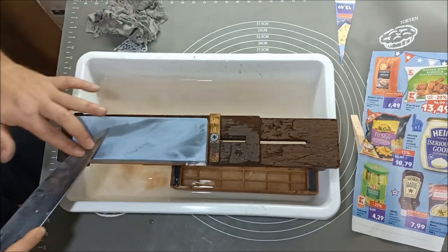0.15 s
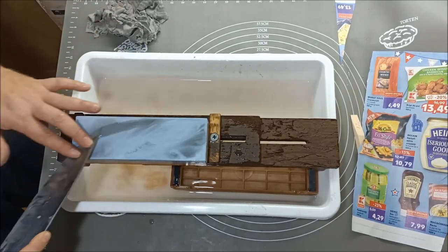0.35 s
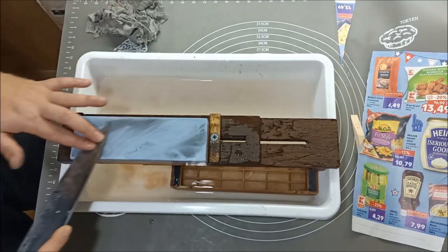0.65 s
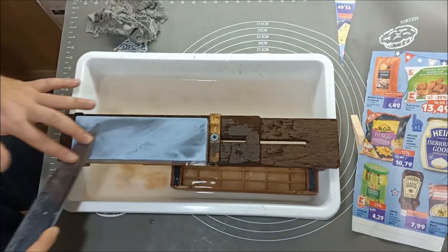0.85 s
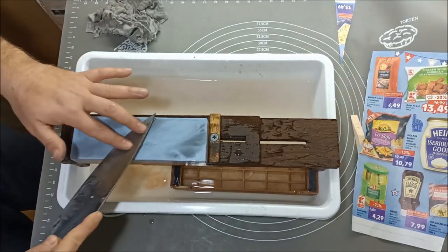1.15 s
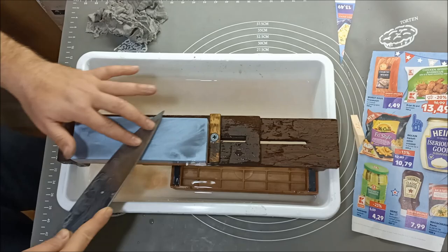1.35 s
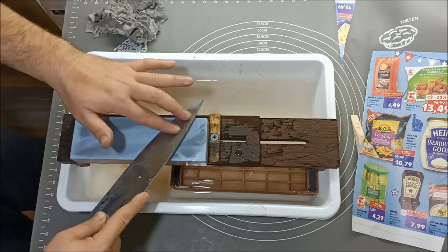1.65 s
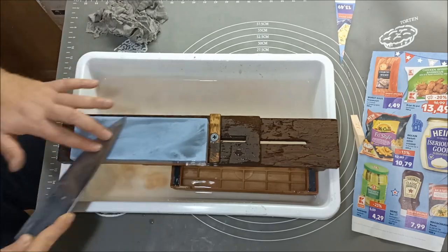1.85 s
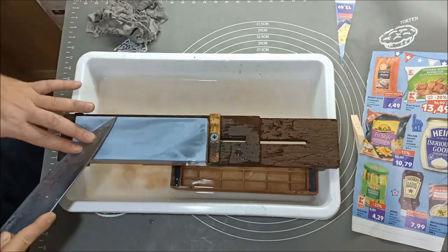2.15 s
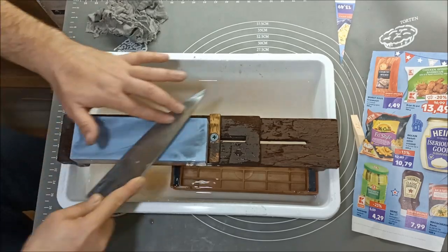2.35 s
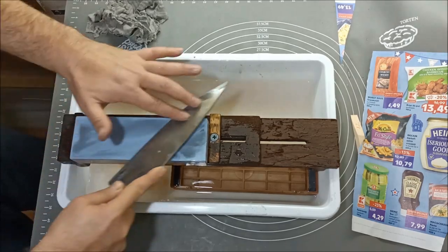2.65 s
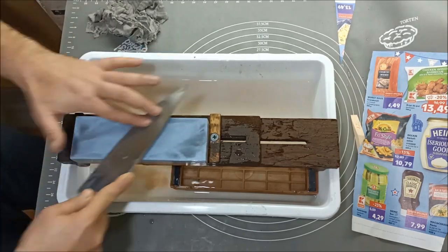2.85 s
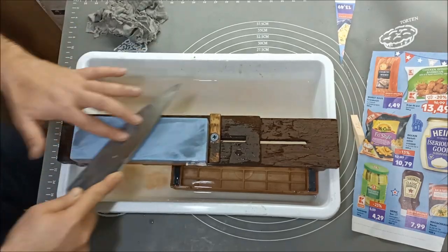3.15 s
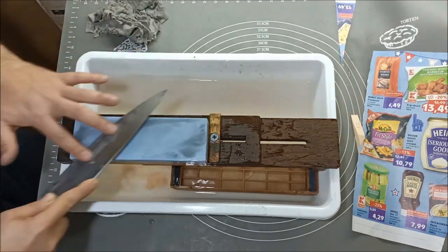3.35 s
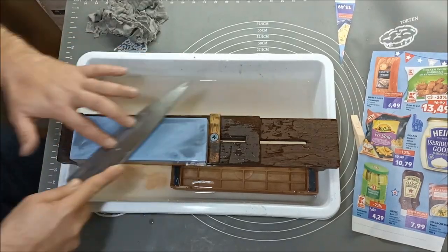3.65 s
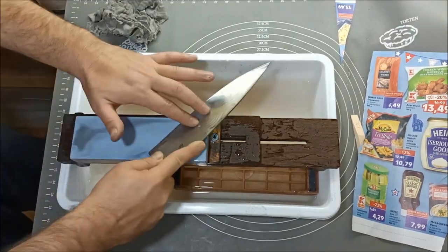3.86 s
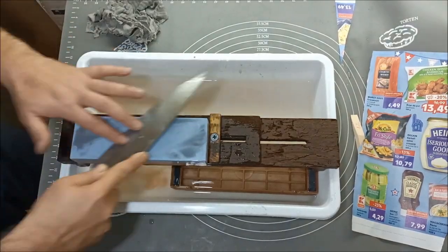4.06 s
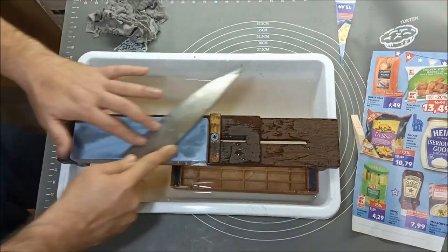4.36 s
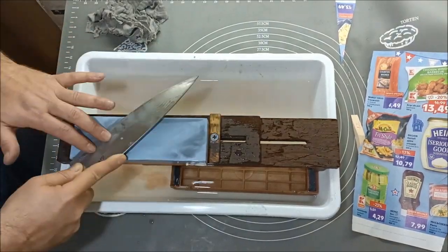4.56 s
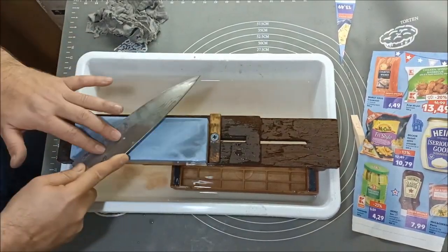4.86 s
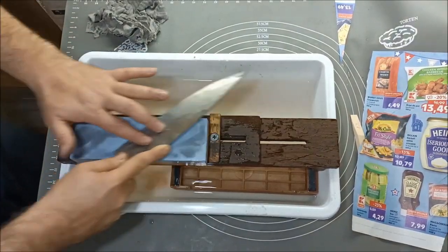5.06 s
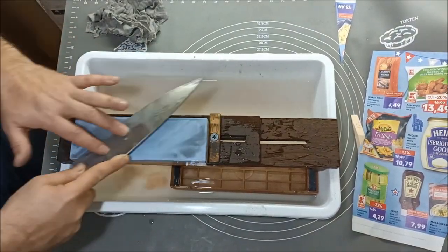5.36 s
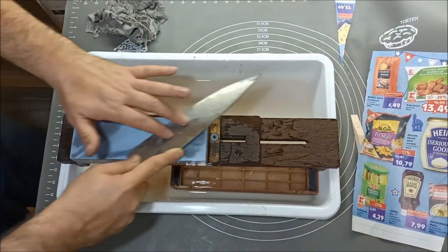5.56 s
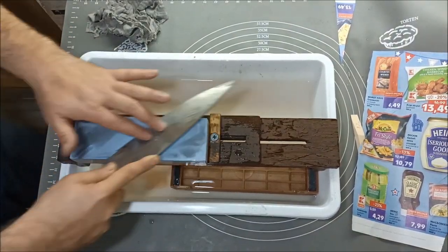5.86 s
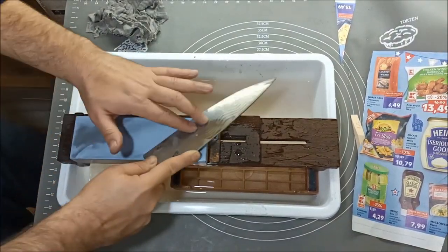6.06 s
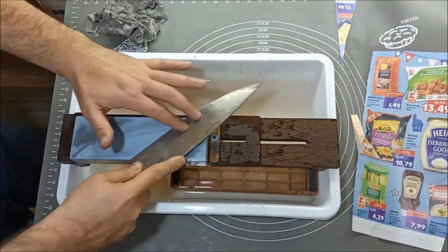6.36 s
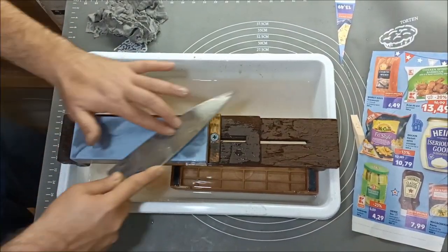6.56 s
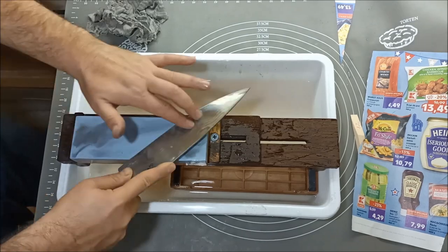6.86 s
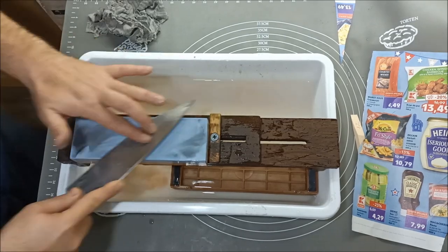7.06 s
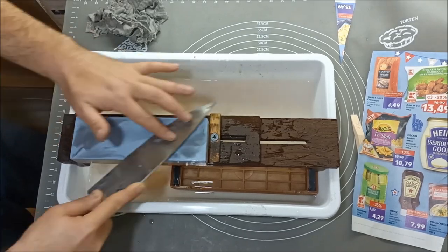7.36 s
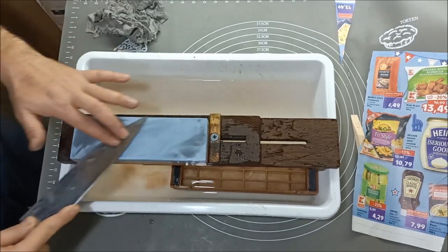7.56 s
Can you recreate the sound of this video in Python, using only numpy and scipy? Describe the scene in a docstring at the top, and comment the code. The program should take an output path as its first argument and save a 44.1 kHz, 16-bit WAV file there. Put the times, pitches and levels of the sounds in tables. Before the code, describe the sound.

Rapid, unbroken knife sharpening heard close from above in a quiet indoor room: shh-shh-shh of metal on wet grit, high and airy, slightly uneven in pressure. The strokes start light and very fast, slow slightly and get firmer around the middle, then soften. Under them a faint low rumble and soft hollow bumps as the holder rocks on its plastic tub, with occasional thin metallic squeaks and pings.

```python
"""Sharpening a knife on a wet whetstone

A steel knife is rubbed to and fro, about seven strokes a second; the contact wanders along its edge to the heel and back.
Grit hisses through the blade: noise coloured by blade modes. At each turn the hiss drops; at some the blade pings.
The turns rock the stone's holder, which knocks on a plastic tub: decaying sine waves and dull noise.
Now and then the edge whistles, and a low blade note flutters: gliding bands of noise.
Two closely spaced microphones listen from above in a quiet room."""
import sys
import numpy as np
from scipy import signal
from scipy.fft import rfft, irfft, next_fast_len
from scipy.io import wavfile
from scipy.ndimage import uniform_filter1d, map_coordinates

SR = 44100
rng = np.random.default_rng(int(sys.argv[2]) if len(sys.argv) > 2 else 0)


def log_audio(samples):
    """Write samples as a 16-bit WAV file to the path given in sys.argv[1]."""
    # one column per channel
    frames = np.atleast_2d(samples).T
    # limit to full scale, then quantise
    limited = np.clip(frames, -1, 1)
    pcm = np.round(limited * 32767).astype(np.int16)
    wavfile.write(sys.argv[1], SR, pcm)


N = 340011

# pulls and pushes in turn: (start [s], early hiss [relative dB], middle hiss [relative dB], late hiss [relative dB])
STROKES = [(-0.07, -44, -48, -60.5), (0.037, -49, -55, -51.5), (0.132, -50, -56.5, -50.5),
           (0.252, -49.5, -44.5, -52.5), (0.348, -48.5, -48.5, -54.5), (0.459, -52.0, -51.5, -53.0),
           (0.56, -51.5, -51, -55), (0.665, -53, -51, -52.5), (0.775, -52, -53.5, -57.5),
           (0.883, -55.5, -52, -52.5), (0.992, -48, -54, -54.5), (1.102, -53, -46, -49),
           (1.215, -51.5, -50.5, -54.5), (1.329, -52.5, -47.5, -45.5), (1.445, -46.5, -50.5, -54.0),
           (1.571, -54.5, -47, -45.5), (1.731, -46.5, -48, -54.5), (1.882, -55.5, -46.0, -46),
           (2.057, -47.5, -44, -51.0), (2.221, -52, -46.5, -46.5), (2.385, -46.5, -44.5, -47.5),
           (2.533, -49.5, -44, -43.5), (2.703, -45, -45, -48.0), (2.849, -48.0, -44, -44.5),
           (3.01, -44.5, -44.5, -46), (3.166, -47.5, -43, -42.5), (3.322, -44, -45, -47),
           (3.475, -47, -44.5, -44.5), (3.633, -39.5, -42.0, -49.5), (3.777, -48.5, -40.5, -42.0),
           (3.926, -41.5, -41, -44), (4.069, -45.0, -41, -42.5), (4.213, -45.5, -42.5, -42.5),
           (4.359, -44, -41, -42), (4.5, -44.5, -44, -40), (4.642, -39, -41.5, -42.5),
           (4.784, -47, -41.5, -41), (4.92, -40.5, -47.5, -48.5), (5.056, -43.5, -43, -37.5),
           (5.194, -38.5, -42.5, -43.5), (5.325, -44, -42.5, -44), (5.456, -41.0, -46.5, -44),
           (5.587, -43.5, -46.5, -48), (5.731, -44, -51, -45.5), (5.869, -41.5, -46.0, -45),
           (6.006, -43.5, -49.0, -47.5), (6.135, -42.5, -48, -49.5), (6.275, -46.5, -48.5, -44),
           (6.405, -43.5, -47.5, -46.0), (6.546, -45.5, -50.0, -47.5), (6.675, -43.5, -50.5, -47.0),
           (6.815, -46, -55, -48.0), (6.941, -44.5, -51, -45), (7.08, -49, -49, -49),
           (7.205, -47.0, -50.5, -45.5), (7.349, -44.5, -53.5, -48.5), (7.472, -47.5, -51, -50.0),
           (7.611, -48.5, -51, -52)]
# where the edge meets the stone: (time [s], place [0 tip, 1 curve, 2 middle, 3 heel])
CONTACT_PLACES = [(0, 1.31), (1.1, 0.5), (1.7, 1.3), (2.8, 1.4), (3.9, 2.68), (4.5, 2.95), (5.4, 3),
                  (5.9, 2.7), (6.7, 1.3), (7.6, 1.1)]
# colour of the scraping at each place: (frequency [Hz], level per Hz [relative dB])
TIP_COLOUR = [(1500, -50), (2700, -23), (4200, -20), (5200, -23), (5700, -12), (6400, -6.5), (7900, -19),
              (8700, -6), (9900, -6), (11200, -2.5), (15500, -7)]
CURVE_COLOUR = [(1500, -57), (2700, -24), (3400, -20.5), (3900, -34), (4350, -21), (5000, -9),
                (5700, -11.5), (6400, -2.5), (7900, -3.5), (9400, -0.5), (13500, -1), (15500, -2.5)]
MIDDLE_COLOUR = [(1500, -27), (2600, -19), (3050, -27), (3700, -17.5), (4200, -12.5), (4950, -10),
                 (5600, -7), (6600, -1.5), (7750, -8.5), (9300, -2), (13200, -2), (15500, -4.5)]
HEEL_COLOUR = [(1500, -39), (2600, -31.5), (3400, -28.5), (3700, -25), (4150, -13), (4900, -18.5),
               (5600, -4), (6600, -5.5), (7900, -10.5), (9700, -3.5), (13500, -3.5), (15500, -8.5)]
# blade modes that keep their pitch wherever the edge lies: (frequency [Hz], rise above nearby hiss [dB])
STEADY_MODES = [(3490, 9), (3726, 9), (4173, 1), (5706, 3), (6325, 3.5)]
# the hand hesitates in mid-stroke: (time [s], pressure change [dB])
HESITATIONS = [(4.03, -3), (4.735, -9), (5.0, -8), (5.288, -11)]
# the edge bites and whistles; the pitches are met at the half-level points:
# (middle [s], length at half level [s], start pitch [Hz], end pitch [Hz], level [relative dB])
BITES = [(1.401, 0.037, 9900, 11000, -47.5), (1.671, 0.1, 11300, 10300, -52),
         (1.756, 0.016, 11900, 14100, -42.5), (1.989, 0.038, 11000, 8200, -46),
         (2.657, 0.045, 11100, 12800, -50), (2.718, 0.015, 12300, 13300, -45.5),
         (2.814, 0.029, 8500, 8250, -50.5)]
# the blade's bending note, lower as more of it overhangs: (time [s], pitch [Hz], level against the hiss [relative dB])
BENDING_NOTE = [(2.3, 2134, -31), (2.701, 1820, -23), (3.749, 1968, -27), (4.699, 1825, -44),
                (6.5, 1852, -31.5), (7.0, 2105, -25)]
# the blade pings as it stops: (time [s], level [relative dB])
PINGS = [(0.136, -68.5), (0.247, -80), (0.456, -74.5), (0.882, -70), (1.102, -65.5), (1.328, -70),
         (1.881, -70), (2.22, -69), (6.005, -70), (6.141, -69.5)]
# the holder lands hard on the tub: (time [s], level [relative dB])
KNOCKS = [(1.603, -57), (2.252, -60), (2.409, -55.5), (2.567, -57), (2.727, -58), (2.883, -52.5),
          (3.197, -57.5), (3.509, -53.5), (3.81, -54.5), (4.105, -55.5), (4.385, -55), (5.489, -54.5),
          (5.766, -57), (6.041, -52.5), (6.311, -54.5), (6.581, -53.5), (6.85, -56), (7.114, -56.5),
          (7.646, -58.5)]
# rocking modes of the holder, before small random changes: (frequency [Hz], level [relative dB], fall by 60 dB [s])
HOLDER_MODES = [(60.2, 2.5, 0.11), (70.5, -3, 0.14), (116.2, -10, 0.19)]
# what the tub rings with, before small random changes: (frequency [Hz], level [relative dB], fall by 60 dB [s])
TUB_MODES = [(221, -8, 0.065), (336, 0.5, 0.046), (640, -9.5, 0.057), (764, -6, 0.03), (965, -7, 0.077),
             (1120, -14.5, 0.03), (1516, -15, 0.068), (2056, -10.5, .05)]
# colour of the quiet room: (frequency [Hz], level per Hz [relative dB])
ROOM_COLOUR = [(15, -23), (32, -3), (65, -5.5), (95, -10.5), (190, -9), (480, -18.5), (1380, -26),
               (2200, -25), (6000, -51)]
# how alike the two microphones hear: (frequency [Hz], left-right likeness [0 to 1])
LIKENESS = [(300, 0.45), (2000, 0.38), (3500, 0.17), (9500, 0.24), (12000, 0.39)]
# balance of the microphones: (frequency [Hz], left minus right [dB])
BALANCE = [(60, -2), (3000, -0.3), (4100, -4), (5500, -1), (9700, 2.5), (12000, 0.5), (15000, -3.5)]

HESITATION_S = 0.012  # time from its deepest point until about a third of the dip is left
UNSTEADY_DB, UNSTEADY_RATE = 0.1, 45  # the pressure wanders: depth [dB], changes a second
MODE_WIDTH_HZ = 40  # width of each steady blade mode
GENTLE_TURN_DB = -63.5  # relative jolt of a turn without a hard knock
BOUNCE_LOSS_DB = 2.5  # each bounce of the chatter is this much weaker
SCUFF_DB, SCUFF_T60 = -6.5, 0.065  # dull, toneless part of a blow: relative level, fall by 60 dB [s]
TOP_HZ = 15850  # the recorder's band limit


def scrape(grain_db, judder_db, hiss_db, tip_lag, heel_lag):
    """Countless grit fractures excite the blade, whose colour and direction follow the place of contact."""
    roughness_db = grain_db * wobble(2500) + judder_db * wobble(130)
    grit = patchy(noise() * amp(roughness_db), broad_db=2.0, fine_db=7.5, glide=0.11, sparse=1.01)
    steel, where = np.zeros((2, N)), place()
    colours = [TIP_COLOUR, CURVE_COLOUR, MIDDLE_COLOUR, HEEL_COLOUR]
    lags = np.linspace(tip_lag, heel_lag, len(colours))
    for k, (colour, lag) in enumerate(zip(colours, lags)):
        share = np.sqrt(np.clip(1 - abs(where - k), 0, 1))
        # neighbouring places ring a quarter cycle apart, so their powers add
        ring = filtered(grit, lambda hz: 1j ** k * amp(along(colour, hz)) * ringing(hz))
        steel += share * microphones(unit(ring), lag)
    return steel * amp(pressure_db() + hiss_db + UNSTEADY_DB * wobble(UNSTEADY_RATE))


def patchy(x, broad_db, fine_db, glide, sparse):
    """A rubbed body's many modes swell and fade, in groups that glide as the contact travels along the stone."""
    hz, s, z = signal.stft(x, SR, nperseg=1024)

    def smooth(field, size):
        over_pitch = uniform_filter1d(field, size[0], axis=-2)
        return unit(uniform_filter1d(over_pitch, size[1], axis=-1))

    # part differs between the two noises, part is common to both
    fine = smooth(rng.standard_normal(z.shape) + rng.standard_normal(z.shape[1:]), size=(3, 7))
    # low modes lie further apart, with deeper valleys between them
    depth = (8000 / np.clip(hz, 3000, 12000))[:, None] ** sparse
    modes = amp(fine_db * depth * np.minimum(fine, 1))
    modes /= np.sqrt(np.mean(modes ** 2, axis=-1, keepdims=True))
    groups = smooth(smooth(rng.standard_normal(z.shape[1:]), size=(18, 3)), size=(10, 1))
    travel = np.cos(np.pi * np.interp(s, clock(), stroke_phase()))
    band, frame = np.indices(groups.shape)
    broad = map_coordinates(groups, [band * (1 + glide * travel), frame], order=1, mode="mirror")
    shaped = z * modes * amp(broad_db * np.sqrt(depth) * broad)
    return signal.istft(shaped, nperseg=1024)[1][:, :N]


def ringing(hz):
    """Gain of the blade's narrow, steady modes, each a peak on an even floor."""
    return 1 + sum((amp(db) - 1) / (1 + (2 * (hz - centre) / MODE_WIDTH_HZ) ** 2)
                   for centre, db in STEADY_MODES)


def brightened(hiss, speed, split_hz, body_give, fizz_give):
    """Faster and harder is brighter: the fizz follows every surge, the blade's lower ring stays steadier."""
    effort_db = pressure_db() + 20 * np.log10(speed)
    surge_db = effort_db - uniform_filter1d(effort_db, size=SR // 2)
    body = filtered(hiss, lambda hz: 1 / (1 + (hz / split_hz) ** 6))
    fizz = hiss - body
    return speed * (body * amp(body_give * surge_db) + fizz * amp(fizz_give * surge_db))


def sliding(slow_time, pull_time, push_time, rest_db):
    """Gain from the blade's speed: it slows into every turn and sticks; a pull breaks away abruptly, a push gently."""
    t, stops = clock(), turns()
    nearest = np.searchsorted((stops[1:] + stops[:-1]) / 2, t)
    since = t - stops[nearest]
    # odd turns start a push, even turns a pull
    leaving = np.where(nearest % 2, (since / push_time) ** 2, (since / pull_time) ** 4)
    stuck = np.exp(-np.where(since < 0, (since / slow_time) ** 2, leaving))
    return 1 - (1 - amp(rest_db)) * stuck


def pressure_db():
    """The hand's pressure swells or sags early, midway and late in each stroke, and gives way where it hesitates."""
    _, *levels_db = np.transpose(STROKES)
    marks = np.arange(len(STROKES))[:, None] + [.2, .5, .8]  # in strokes
    lapses = sum(db * np.exp(-((clock() - s) / HESITATION_S) ** 2) for s, db in HESITATIONS)
    return np.interp(stroke_phase(), marks.ravel(), np.ravel(levels_db, order="F")) + lapses


def place():
    """The part of the edge that lies on the stone, at every sample."""
    return np.interp(clock(), *np.transpose(CONTACT_PLACES))


def turns():
    """The moments [s] at which the blade reverses and a new stroke begins."""
    return np.transpose(STROKES)[0]


def stroke_phase():
    """Strokes done so far: whole numbers at the turns."""
    stops = np.append(turns(), turns()[-1] + np.diff(turns()).mean())
    return np.interp(clock(), stops, np.arange(len(stops)))


def bites(width_hz, level_db):
    """Where the edge digs in, a narrow band of noise swells and glides: slow noise times a gliding sine."""
    t, out = clock(), np.zeros((2, N))
    band = unit(filtered(noise(), lambda hz: np.exp(-(hz / width_hz) ** 2)))
    for s, length, start_hz, end_hz, db in BITES:
        near = abs(t - s) < length
        u = (t[near] - s) / length
        hz = start_hz + (end_hz - start_hz) * (u + .5)
        swell = amp(db + level_db) * np.cos(np.pi * u / 2) ** 2
        out[:, near] += swell * band[:, near] * np.sin(2 * np.pi * np.cumsum(hz) / SR)
    return out


def bending(level_db, width_hz, swing, stray, flutter_db):
    """A low bending mode flutters up in mid-stroke; its pitch falls along a pull and rises along a push."""
    s, note_hz, note_db = np.transpose(BENDING_NOTE)
    angle = np.pi * stroke_phase()
    hz = np.interp(clock(), s, note_hz) * (1 + swing * np.cos(angle) + stray * wobble(UNSTEADY_RATE))
    slow_noise = filtered(noise(), lambda f: np.exp(-(f / width_hz) ** 2))
    flutter = amp(flutter_db * np.tanh(wobble(UNSTEADY_RATE)))
    band = unit(slow_noise * np.sin(angle) ** 2 * flutter)
    level = amp(pressure_db() + np.interp(clock(), s, note_db) + level_db)
    return level * band * np.sin(2 * np.pi * np.cumsum(hz) / SR)


def pings(note_hz, width_hz, level_db, slip, t60, tail_db, tail_t60):
    """The blade judders as it stops: a few blunt slips, then its note rings on roughly into the next stroke."""
    ticks, tails, t = np.zeros(N), np.zeros(N), np.arange(SR // 4) / SR
    for s, db in PINGS:
        for k, (late, size) in enumerate(rng.standard_normal((3, 2))):
            fade = amp(db + level_db + 2 * size - 60 * t / t60)
            blunt_start = np.tanh(t / slip * 4)
            tick = fade * blunt_start * np.sin(2 * np.pi * note_hz * t)
            add(ticks, s + slip * (k - 2 + late / 2), tick)
        add(tails, s, amp(db + tail_db - 60 * t / tail_t60))
    rough_note = unit(filtered(noise(), lambda hz: np.exp(-((hz - note_hz) / width_hz) ** 2)))
    return ticks + tails * rough_note


def knocks(level_db, bounce_s, soft_db, soft_delay, rub_db):
    """The holder hits the tub and rebounds, softly after other turns; the sliding blade rumbles through it too."""
    out = np.zeros((2, N))
    soft = [(s + soft_delay, soft_db + rng.normal(0, 3.5))
            for s, db in reversals() if db == GENTLE_TURN_DB]
    for s, db in KNOCKS + soft:
        for bounce, late in enumerate(rng.uniform(-0.985, 1, size=4)):
            blow = amp(db + level_db - BOUNCE_LOSS_DB * bounce) * tub_ring()
            add(out, s + bounce_s * bounce * (1 + 0.153 * late), blow)
    rubbing = patchy(noise(), broad_db=0.5, fine_db=6.5, glide=0, sparse=0)
    rumble = unit(signal.fftconvolve(rubbing, tub_ring(), axes=1)[:, :N])
    return out + rumble * amp(rub_db + 0.29 * pressure_db() + 2.1 * wobble(20))


def tub_ring():
    """One blow's ring of the tub, a little different each time: direct and scattered sound."""
    t = np.arange(SR // 8) / SR
    dull = signal.butter(4, TUB_MODES[-2][0], fs=SR, output="sos")
    scuff = signal.sosfilt(dull, rng.standard_normal((2, len(t))))
    out = unit(scuff) * amp(SCUFF_DB - 60 * t / SCUFF_T60)
    for k, (hz, db, t60) in enumerate(TUB_MODES):
        phase = np.pi * np.array([[k], [rng.uniform(0, 1.64)]])
        fade = amp(db + rng.normal(0, 3.4) - 60 * t / t60)
        out = out + fade * np.sin(2 * np.pi * hz * rng.normal(1, 0.04) * t + phase)
    return out * (1 - np.exp(-2 * np.pi * TUB_MODES[-1][0] * t))  # soften the start


def rocking(jolts, level_db, delay, rise):
    """Friction reverses at each turn and sways the holder the other way; a harder knock goes with a wider sway."""
    out, t = np.zeros(N), np.arange(SR // 4) / SR
    for k, (s, knock_db) in enumerate(jolts, 1):
        sway = np.zeros(len(t))
        for hz, db, t60 in HOLDER_MODES:
            fade = amp(db + rng.normal(0, 1) - 60 * t / t60)
            sway += fade * np.sin(2 * np.pi * hz * rng.normal(1, 0.039) * t)
        push = (-1) ** k * amp(level_db + 0.5 * knock_db)
        add(out, s + delay, push * sway * (1 - np.exp(-(t / rise) ** 2)))
    return out


def reversals():
    """(time [s], jolt [relative dB]) of each turn: as strong as the knock that follows it, else gentle."""
    jolt_db = np.full(len(STROKES), float(GENTLE_TURN_DB))
    s, db = np.transpose(KNOCKS)
    jolt_db[np.searchsorted(turns(), s) - 1] = db
    return list(zip(turns(), jolt_db))[1:]


def quiet_room(level_db):
    """The room's faint, steady background: noise with most of its strength in the bass."""
    return amp(level_db) * coloured(noise(), ROOM_COLOUR)


def microphones(pair, lag_samples):
    """Sound reaches the right microphone first; scattered sound makes the two differ."""
    def turn(hz):
        return np.arccos(np.clip(along(LIKENESS, hz), -1, 1)) / 2

    mid, side = filtered(pair, lambda hz: np.array([np.cos(turn(hz)), np.sin(turn(hz))]))
    half = np.array([[.5], [-.5]])  # left and right each take half of the difference

    def tilt(hz):
        return amp(half * along(BALANCE, hz)) * np.exp(-2j * np.pi * hz * half * lag_samples / SR)

    return filtered(np.array([mid + side, mid - side]), tilt)


def amp(db):
    """Decibels to gain."""
    return 10 ** (np.asarray(db) / 20)


def unit(x):
    """x scaled to an rms (average strength) of 1."""
    return x / np.sqrt(np.mean(x ** 2) + 1e-20)


def along(points, hz):
    """(frequency [Hz], value) points read on a log axis."""
    f, v = np.transpose(points)
    return np.interp(np.log(hz + 1), np.log(f + 1), v)


def clock():
    """The time [s] of every sample."""
    return np.arange(N) / SR


def wobble(rate):
    """A smooth random curve through `rate` random points a second."""
    return map_coordinates(rng.standard_normal(int(N * rate / SR) + 4), [np.arange(N) * rate / SR])


def filtered(x, response):
    """x times a response of frequency."""
    m = next_fast_len(N + 8192)  # spare room so that the end does not wrap onto the start
    return irfft(rfft(x, m) * response(np.fft.rfftfreq(m, 1 / SR)), m)[..., :N]


def coloured(x, spectrum):
    """x shaped by the given spectrum, at rms 1."""
    return unit(filtered(x, lambda hz: amp(along(spectrum, hz))))


def add(track, s, sound):
    """Mix a sound into the track from time s on."""
    i = int(np.clip(round(s * SR), 0, N))
    track[..., i:i + sound.shape[-1]] += sound[..., :N - i]


def noise():
    """Two unrelated noises: the direct sound and the scattered sound."""
    return rng.standard_normal((2, N))


def scene():
    """Blade, tub, holder and room, as heard from above."""
    speed = sliding(slow_time=0.0113, pull_time=0.0106, push_time=0.0093, rest_db=-13.7)
    hiss = scrape(grain_db=0.63, judder_db=-0.39, hiss_db=1.19, tip_lag=3.4, heel_lag=2.72)
    hiss = brightened(hiss, speed, split_hz=9500, body_give=-0.26, fizz_give=0.044)
    whistles = bites(width_hz=1000, level_db=6.0)
    low_note = bending(level_db=-2, width_hz=126, swing=0.12, stray=0.025, flutter_db=7)
    stops = pings(note_hz=2220, width_hz=100, level_db=7, slip=0.003, t60=0.022, tail_db=-11.5, tail_t60=1.3)
    tub = knocks(level_db=-4.0, bounce_s=0.0075, soft_db=-65.0, soft_delay=.027, rub_db=-68.5)
    room = quiet_room(level_db=-73.5)
    sway = rocking(reversals(), level_db=-20.0, delay=0.0019, rise=0.024)
    holder = sway * amp([[.6], [-.6]])  # slightly louder on the left
    heard = microphones(speed * (whistles + low_note) + tub + room, lag_samples=3.9)
    return hiss + heard + stops + holder


def record(dry):
    """The recorder keeps nothing above its band limit."""
    return filtered(dry, lambda hz: hz < TOP_HZ)


dry = scene()
out = record(dry)
log_audio(out)
```